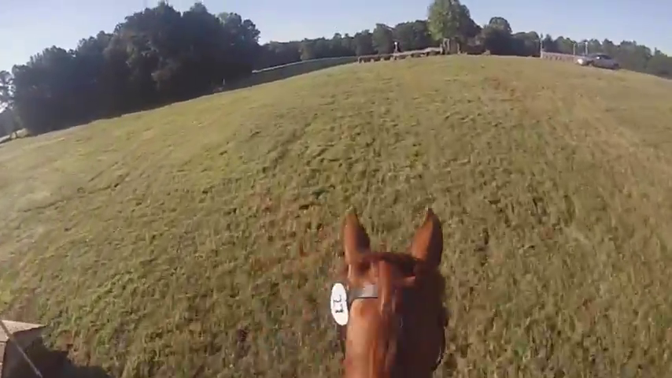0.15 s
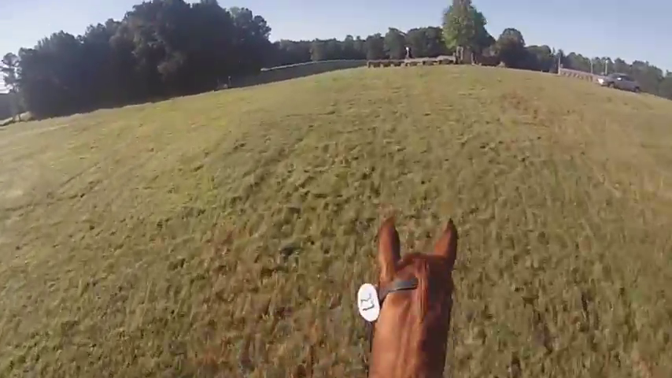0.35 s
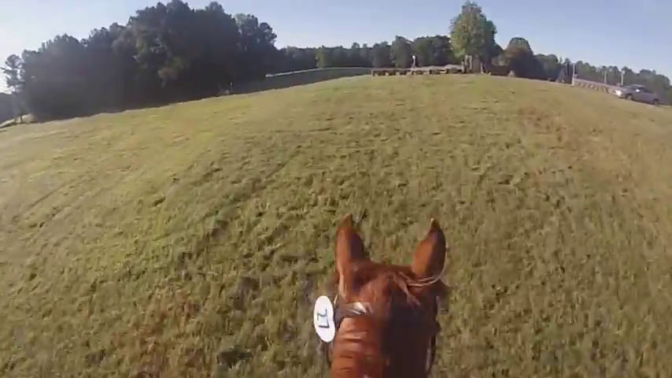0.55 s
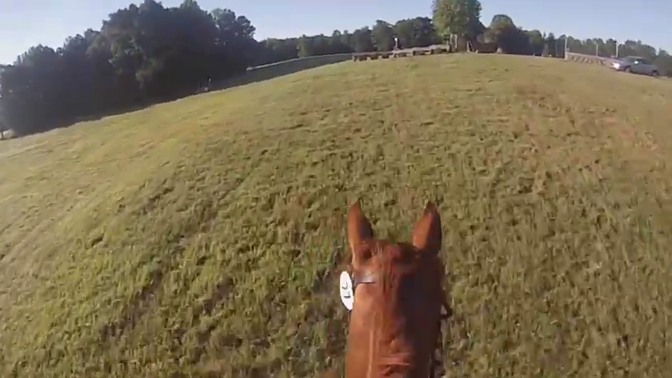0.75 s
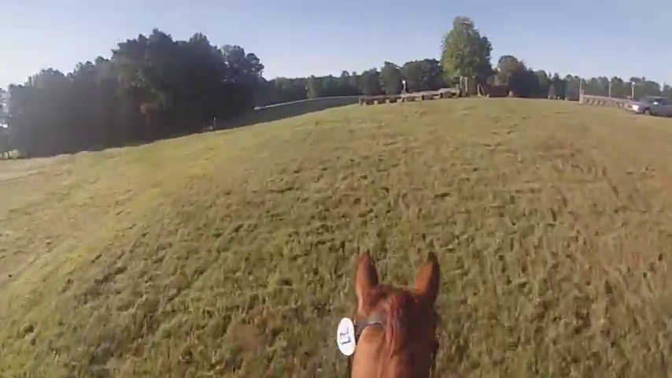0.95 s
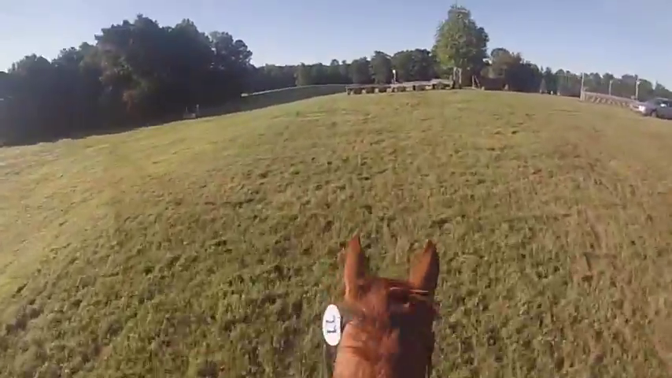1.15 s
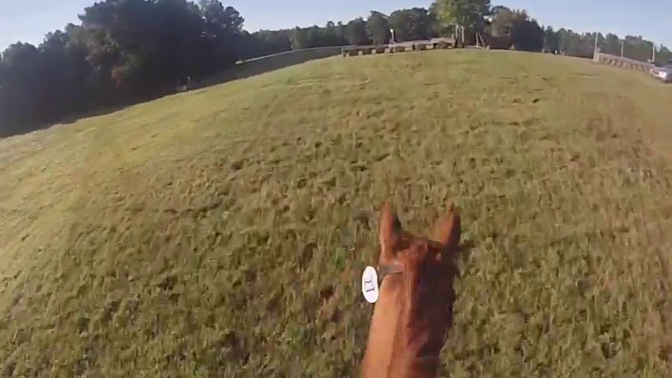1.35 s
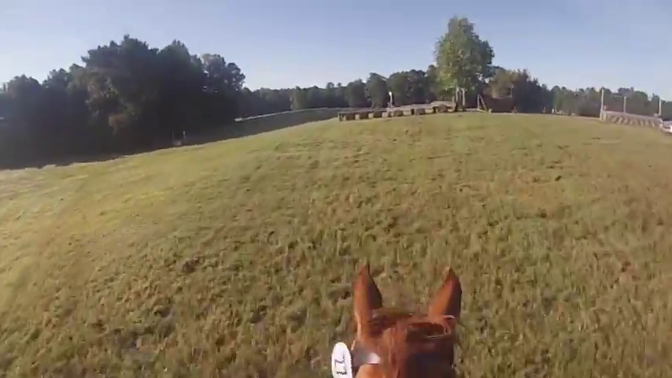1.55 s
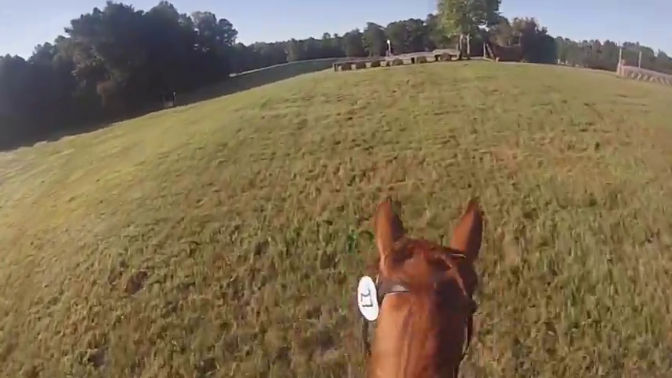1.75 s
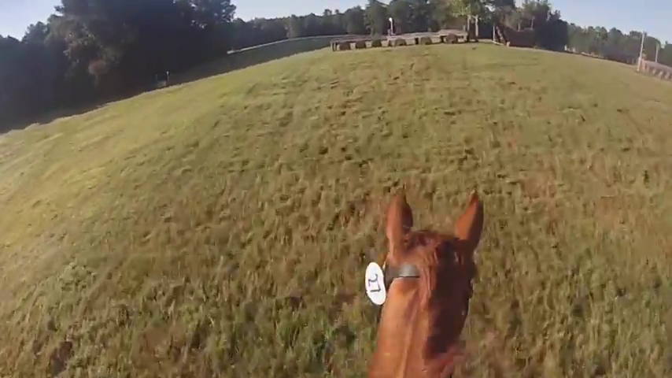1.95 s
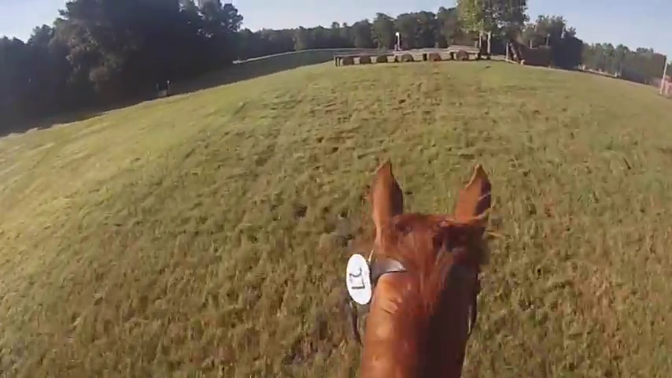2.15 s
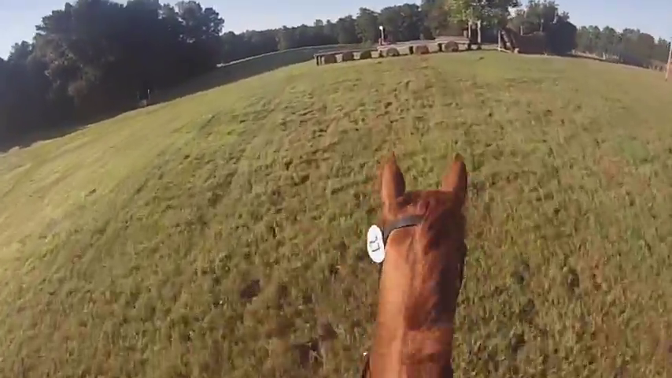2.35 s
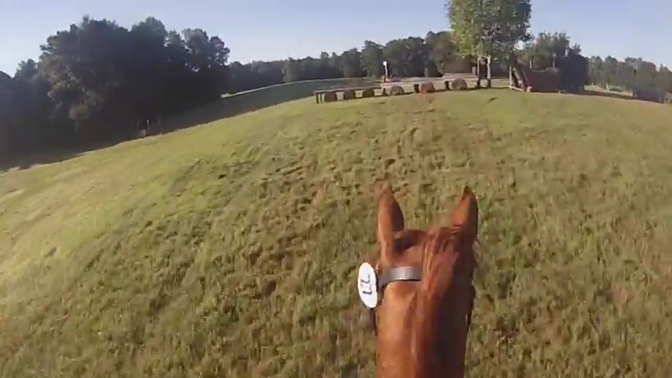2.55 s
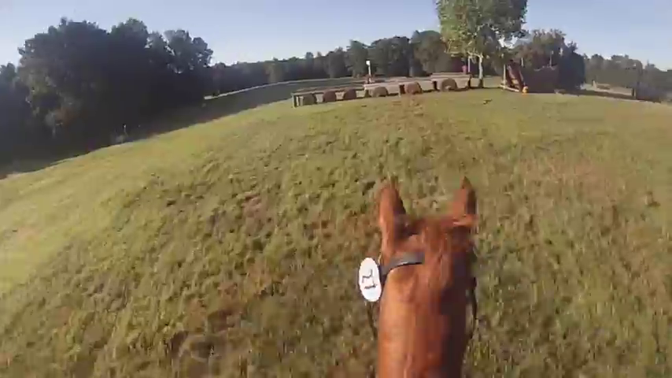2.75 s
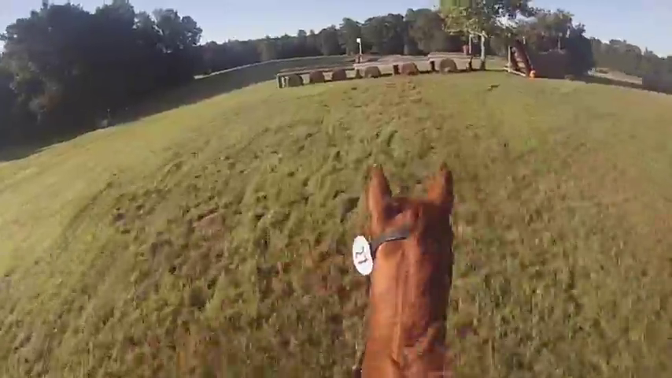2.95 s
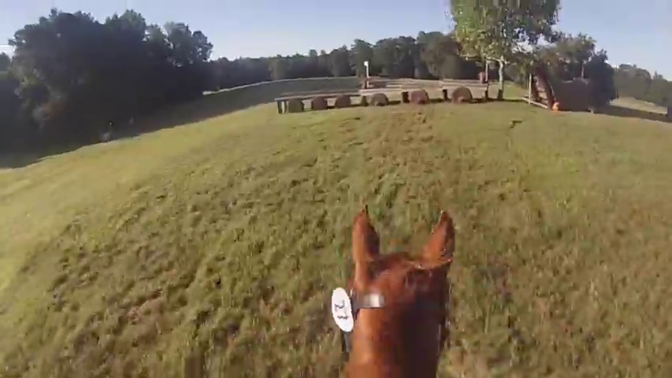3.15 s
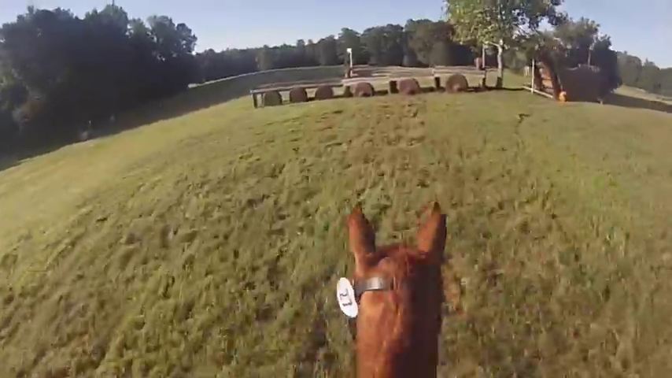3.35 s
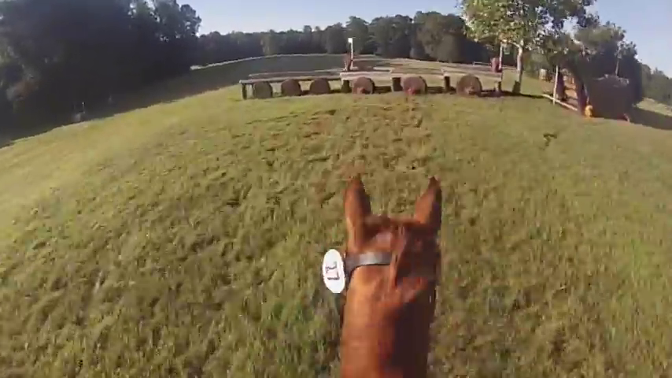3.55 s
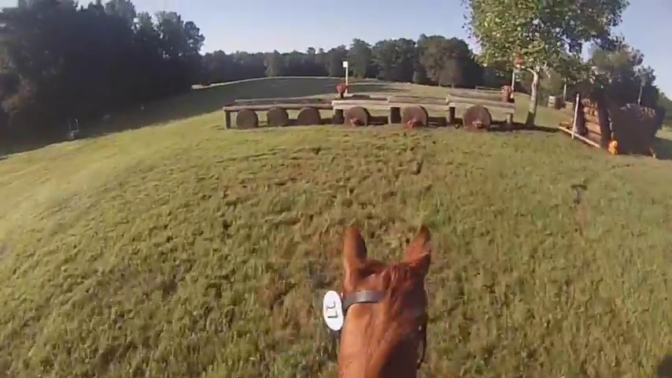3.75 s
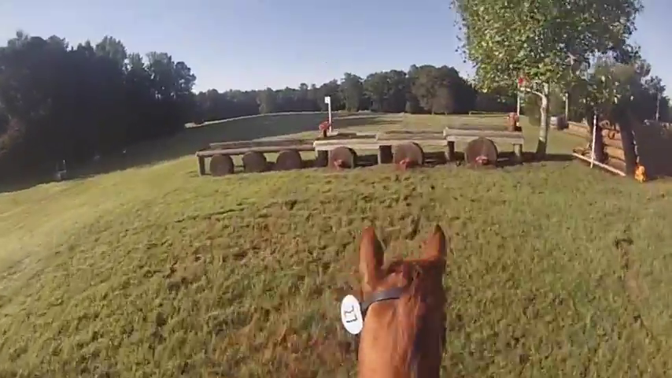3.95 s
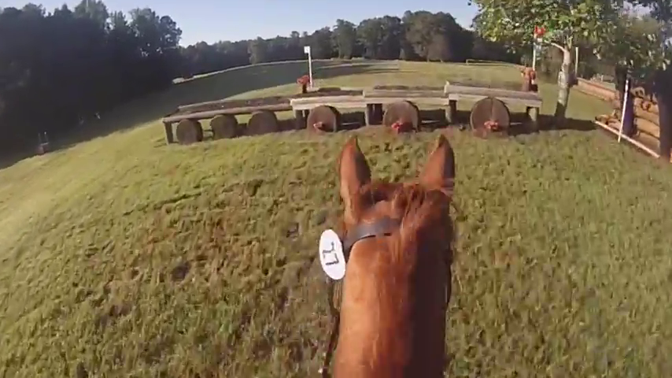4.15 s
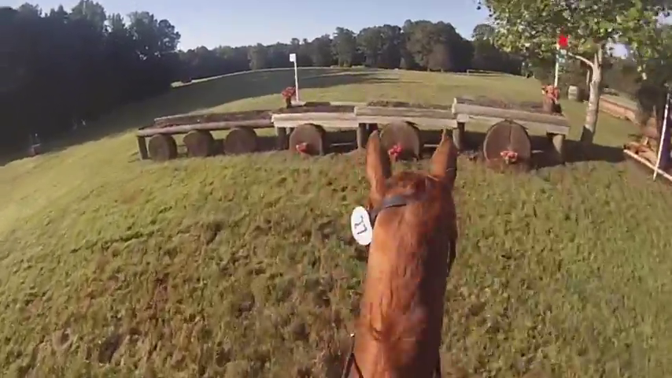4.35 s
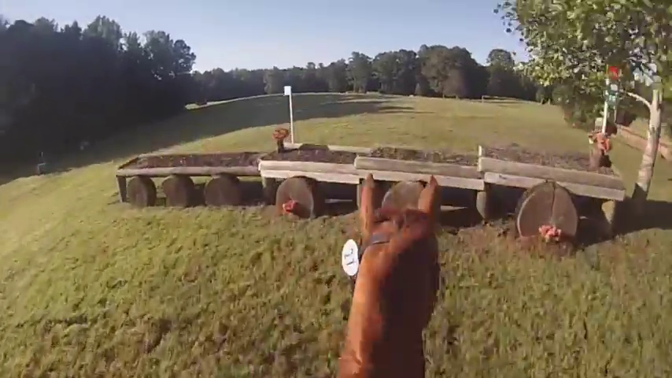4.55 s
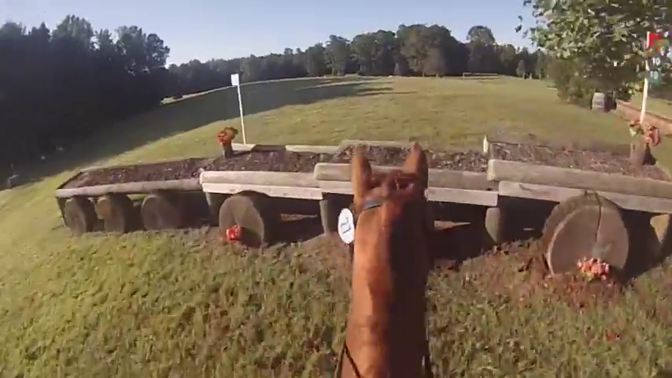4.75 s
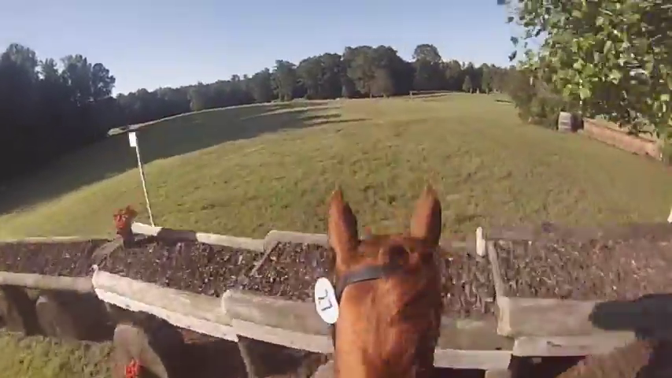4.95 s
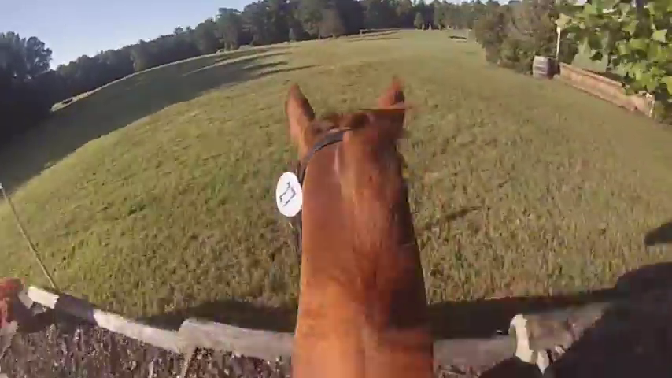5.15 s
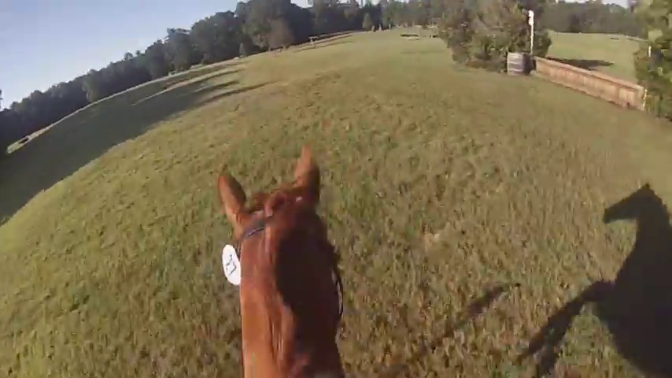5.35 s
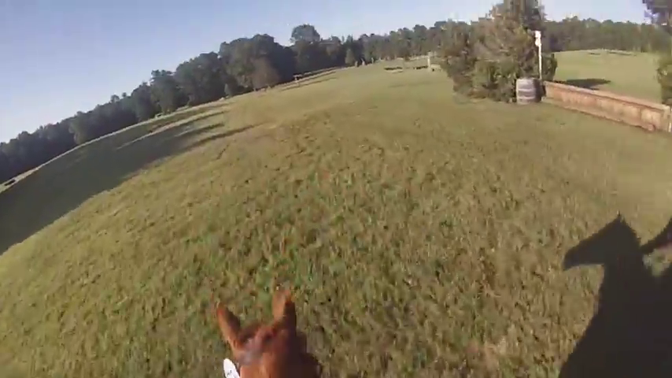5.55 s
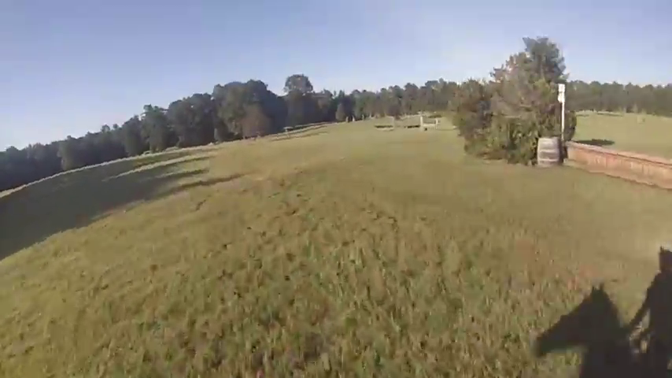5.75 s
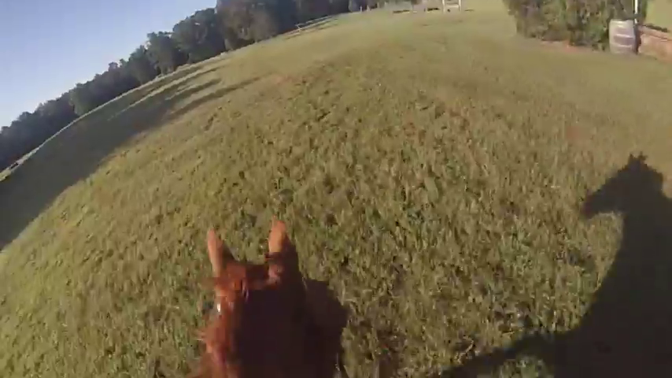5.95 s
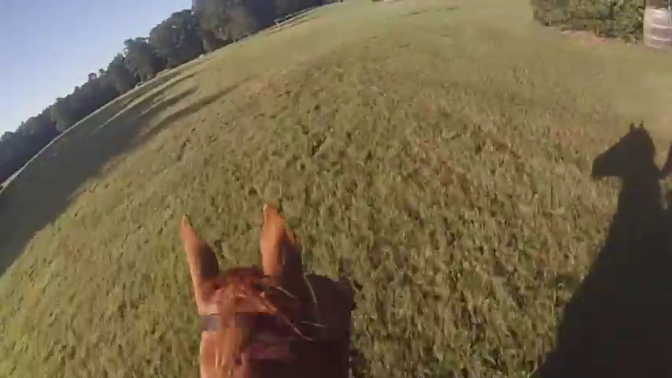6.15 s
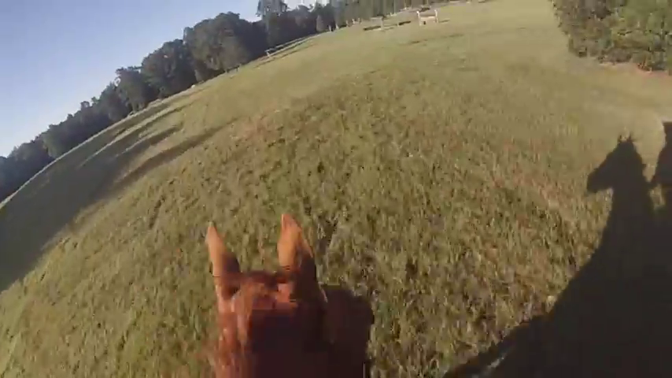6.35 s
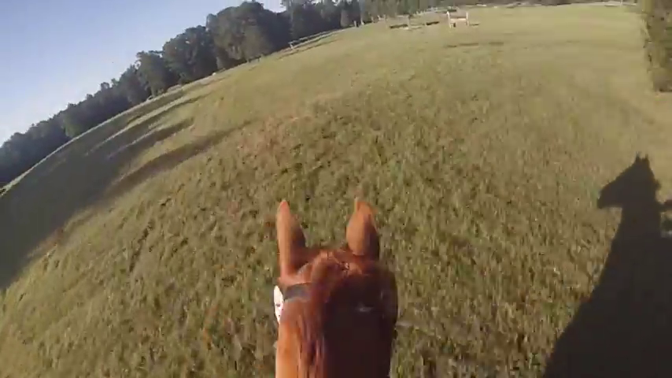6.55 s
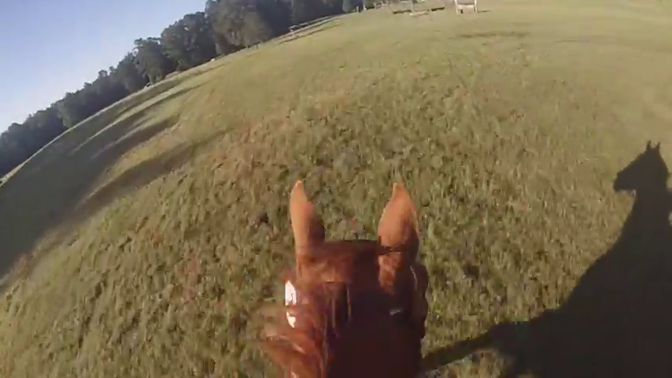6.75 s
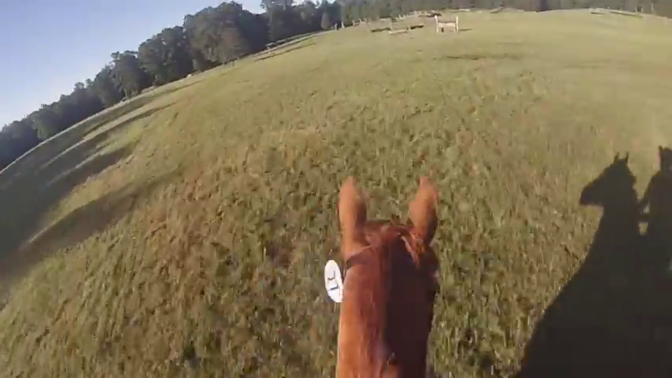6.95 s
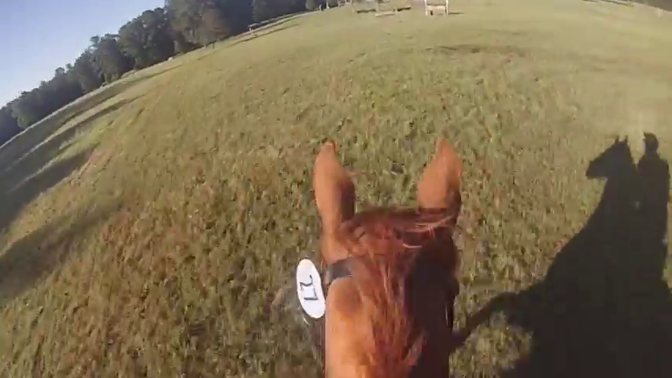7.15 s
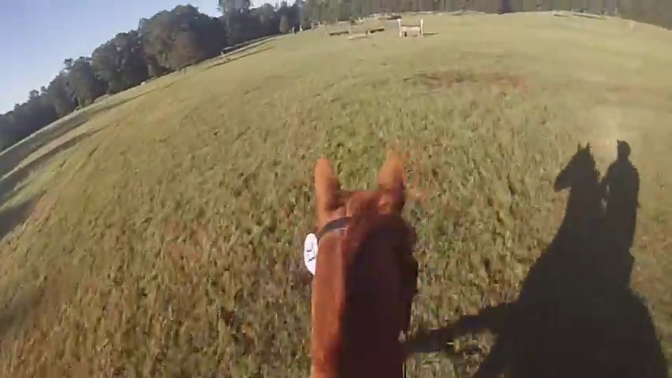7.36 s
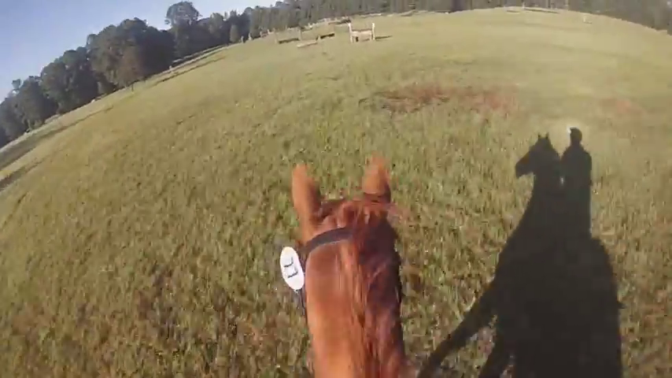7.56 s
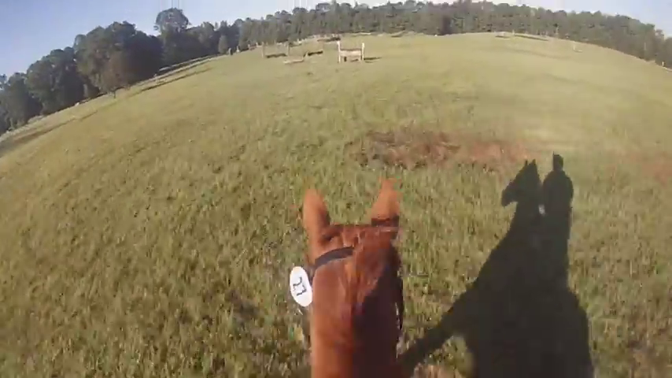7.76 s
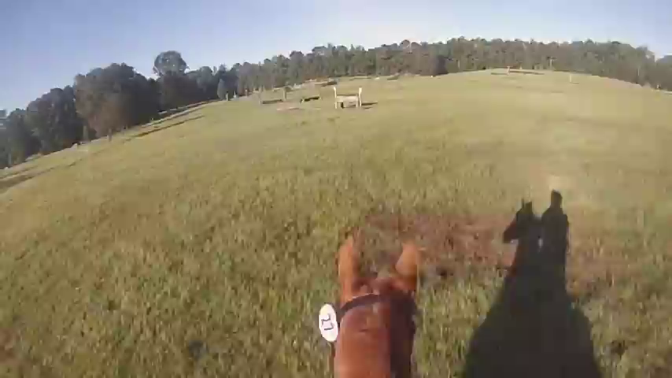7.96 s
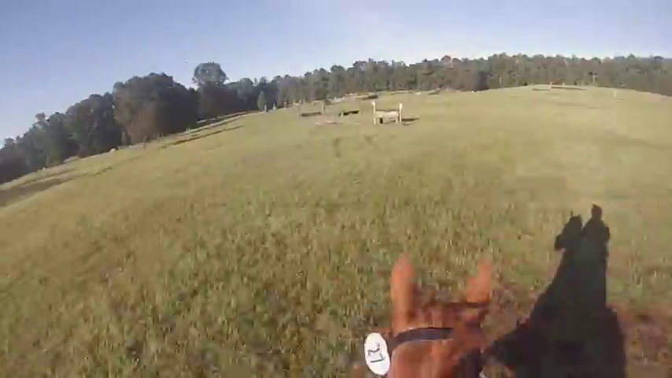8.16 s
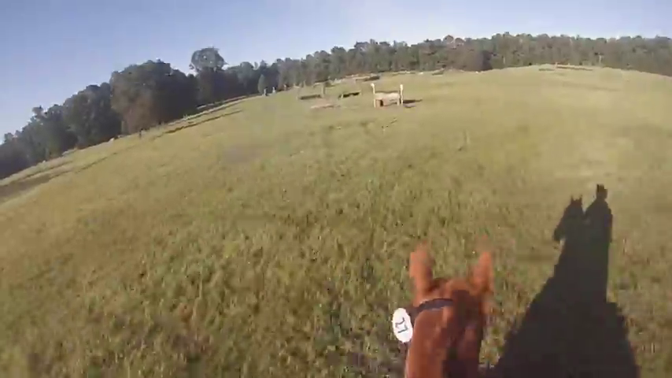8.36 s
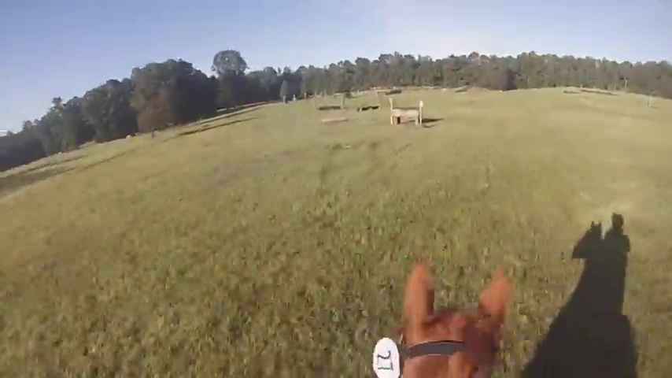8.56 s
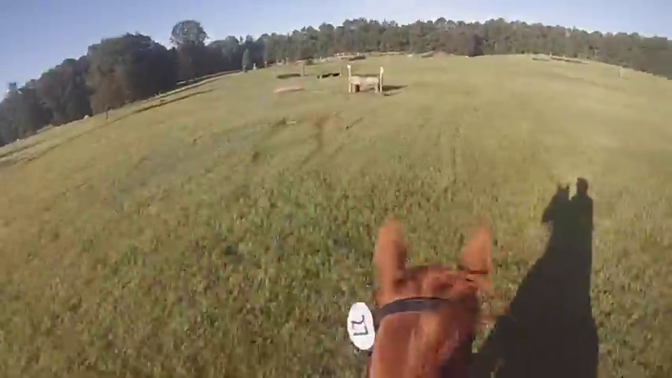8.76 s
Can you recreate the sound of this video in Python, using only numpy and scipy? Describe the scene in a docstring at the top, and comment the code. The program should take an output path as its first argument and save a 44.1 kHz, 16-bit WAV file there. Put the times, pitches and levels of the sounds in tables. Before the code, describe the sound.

Heard through a closed camera housing on a galloping rider's helmet: low wind buffeting, a hollow drone and dull stride thumps. A sharp knock comes early; near five seconds hard plastic clacks cluster at the jump, then a heavy rattling landing jolt. Afterwards the knocks stop and the wind grows stronger.

```python
"""Grassland, at a gallop and across a jump, heard from a camera in a closed housing on a rider's helmet.
Headwind is shaped noise: a blown cavity drone, low buffeting and a rush in the housing's resonances, with
thin whistles. Strides swing a damped spring mount; knocks ring the housing's shell and back plate over a
low thump. Straps squeak and swish as filtered noise; gain control ducks the hardest hits over faint hiss."""
import sys
import numpy as np
from scipy import signal
from scipy.fft import next_fast_len
from scipy.io import wavfile

SR = 44100
rng = np.random.default_rng(int(sys.argv[2]) if len(sys.argv) > 2 else 0)


def persist_wave(psi):
    """Save psi, clipped to +-1, as 16-bit WAV."""
    counts = np.round(np.clip(psi, -1, 1) * 32767).astype(np.int16)
    wavfile.write(sys.argv[1], SR, np.atleast_2d(counts).T)


N = 388521
TIME = np.arange(N) / SR

# headwind rising and falling as the head nods into it, before small gusts:
# (time [s], buffeting level [dB], rush level in the upper modes [dB])
HEADWIND_CURVE = [(0.0, -47, -59.5), (0.29, -44.5, -55.5), (0.56, -43, -57), (1.0, -47.5, -59),
                  (1.15, -40.5, -52), (1.4, -44.5, -58.5), (1.64, -43, -51.5), (1.95, -46.5, -58.5),
                  (2.15, -42.5, -56), (2.5, -51.5, -62), (2.75, -50.5, -65.5), (2.98, -50, -64.5),
                  (3.05, -42.5, -59), (3.14, -49.5, -63), (3.24, -40.5, -54.5), (3.29, -53, -66),
                  (3.33, -37, -55.5), (3.46, -48, -61), (3.58, -41, -53), (4.03, -39.5, -49),
                  (4.37, -47.5, -63), (4.68, -39.5, -45), (4.92, -41.5, -54), (5.05, -38.5, -47.5),
                  (5.34, -44.5, -59), (5.45, -44, -54), (5.68, -40.5, -50.5), (5.78, -31.5, -42),
                  (5.86, -37, -46.5), (5.95, -42, -46), (6.06, -45.5, -62), (6.3, -41, -51.5),
                  (6.8, -41, -53.5), (7.05, -39, -52), (7.55, -37.5, -53.5), (7.78, -37, -48.5),
                  (7.86, -36, -50.5), (8.05, -35, -49), (8.22, -32, -43.5), (8.4, -38, -44.5),
                  (8.55, -35.5, -46), (8.7, -37.5, -45.5), (8.81, -36, -48)]
# the lowest cavity mode, blown like a bottle, before its wavering: (time [s], level [dB])
DRONE_CURVE = [(0.0, -48), (0.47, -49), (0.51, -43), (0.81, -55), (0.91, -36.5), (0.96, -58.5),
               (1.1, -41.5), (1.62, -46), (1.67, -40.5), (1.81, -51), (2.18, -42.5), (2.3, -53),
               (3.73, -47), (3.75, -36.5), (4.32, -52), (4.56, -49), (4.64, -34), (4.83, -48), (4.91, -24),
               (4.95, -53), (5.15, -36.5), (5.4, -50), (5.62, -39), (5.72, -46), (5.79, -32), (5.94, -56),
               (5.99, -36), (6.13, -48.5), (7.16, -43.5), (7.7, -55), (7.73, -51), (8.81, -39)]
# the wind angle shifts the rush between modes:
# (time [s], lift of modes under 1 kHz [dB], lift of modes over 1.8 kHz [dB])
WIND_ANGLE_CURVE = [(0, 1, -4), (.5, 1, -1), (1, -1.5, -1.5), (1.6, -1, 1.5), (2.2, 0, -1.5),
                    (2.8, 2.5, -3), (3.3, 2, 0.5), (3.9, -1.5, -0.5), (4.5, 1.5, 2), (5, -4.5, -0.5),
                    (5.4, 0.5, -1.5), (5.8, -0.5, 4.5), (6.3, -1.5, 0.5), (7, -2, -1.5), (7.6, 0, -1),
                    (8.1, -0.5, 0), (8.45, -4, 1.5), (8.81, -3.5, 3)]
# low resonances stirred by buffeting: (frequency [Hz], width [Hz], relative drive [dB])
BUFFET_RESONANCES = [(87.5, 29, -4.5), (198, 65.7, -1), (248, 62, -15), (156, 30, -13), (337, 53, -12.5)]
# housing resonances that color the rush: (frequency [Hz], width [Hz], relative drive [dB])
HOUSING_RESONANCES = [(540, 197, -4.5), (809, 130, -2.5), (1301, 194, -2), (1480, 144, 0),
                      (1989, 199, -1.5), (2246, 270, -9.5), (3915, 110, -15.5)]
DRONE_HZ, DRONE_WIDTH_HZ = 123.7, 16.4
TREBLE_FALL_HZ = 2580
TREBLE_DB, TREBLE_SHARE = -69, 0.096   # level at a rush of -55 dB; dB gained per dB of rush


def headwind():
    """Turbulence blows a cavity drone, low buffeting, a rush in the housing modes and faint treble."""
    buffet_db, rush_db = in_time(HEADWIND_CURVE)
    gust_db = 0.62 * drift(2.5)   # small gusts lift both together
    buffet_db = buffet_db + gust_db
    rush_db = rush_db + gust_db

    drone = resonance(rng.standard_normal(N), DRONE_HZ, DRONE_WIDTH_HZ)
    drone = resonance(drone, DRONE_HZ, 1.7 * DRONE_WIDTH_HZ)
    envelope = np.abs(signal.hilbert(drone, next_fast_len(N))[:N])
    drone = drone / (envelope + 1e-9) ** 0.4   # a blown tone steadies itself
    drone_gain = amp(in_time(DRONE_CURVE)[0] + 1.0 * drift(4))

    buffet = eddies(BUFFET_RESONANCES, flutter_db=-0.5, patchy_db=2.5)
    buffet = butter(buffet, 421, "low", order=4)

    low_db, high_db = in_time(WIND_ANGLE_CURVE)
    modes = [(hz, width_hz, db + low_db * (hz < 1000) + high_db * (hz > 1800))
             for hz, width_hz, db in HOUSING_RESONANCES]
    rush = butter(eddies(modes, flutter_db=1.5, patchy_db=-0.5), 3030, "low")
    rush = rush / butter(rush, 1650, "high", order=4).std()   # the curve sets the upper modes' level

    treble = butter(rng.standard_normal(N), TREBLE_FALL_HZ, "low")
    treble = butter(treble, 4530, "high")
    treble_db = TREBLE_DB + TREBLE_SHARE * (rush_db + 55)

    low = drone_gain * rms_one(drone) + amp(buffet_db) * rms_one(buffet)
    return low + amp(rush_db) * rush + amp(treble_db) * rms_one(treble)


def eddies(modes, flutter_db, patchy_db):
    """Turbulence drives every mode; all flutter together and each also on its own."""
    together = flutter_db * drift(29)
    total = 0
    for hz, width_hz, db in modes:
        drive = amp(db + together + patchy_db * drift(11.2))
        total = total + drive * resonance(rng.standard_normal(N), hz, width_hz)
    return rms_one(total)


# stride jolts: (time [s], peak level [dB], starting swing frequency [Hz], decay T60 [s])
STRIDE_JOLTS = [(0.008, -34, 44, 0.13), (0.102, -31, 42.2, 0.39), (0.213, -36, 43.7, 0.4),
                (0.281, -29, 42.4, 0.13), (0.325, -17.5, 39.4, 0.075), (0.377, -19.5, 28, 0.23),
                (0.858, -13.5, 32.5, 0.1), (0.904, -16, 28.2, 0.22), (1.382, -18.5, 29.6, 0.39),
                (1.623, -29.5, 48.3, 0.3), (1.941, -18.5, 33, 0.22), (2.133, -20.5, 45.6, 0.28),
                (2.314, -26, 43, 0.42), (2.426, -22.5, 53.8, 0.14), (2.531, -31, 34, 0.47),
                (2.826, -36, 32.8, 0.37), (2.964, -22, 28.4, 0.26), (3.037, -25, 41.5, 0.39),
                (3.379, -25, 33.8, 0.46), (3.451, -17, 34.1, 0.39), (3.772, -12.5, 44, 0.39),
                (3.91, -13.5, 35.2, 0.25), (4.036, -22.5, 36.2, 0.14), (4.257, -18.5, 42.8, 0.55),
                (4.466, -18, 30, 0.18), (4.635, -12.5, 51.4, 0.26), (4.771, -3, 32, 0.22),
                (4.901, -10.5, 33.8, 0.15), (5.039, -17.5, 48.3, 0.3), (5.215, -15.5, 37, 0.26),
                (5.438, -19, 45.5, 0.52), (5.746, -14, 37, 0.11), (5.7675, 6.5, 34.6, 0.15),
                (5.858, -15, 52, 0.09), (5.998, -8.5, 34.7, 0.19), (6.202, -38, 29.8, .16),
                (6.582, -20.5, 44.9, 0.79), (6.988, -27.5, 29.6, 0.82), (7.184, -21.5, 44, 0.38),
                (7.394, -22.5, 47.4, 0.25), (7.497, -21.5, 29.4, 0.096), (7.617, -26, 45.3, 0.82),
                (7.76, -19, 31.2, 0.08), (7.792, -15, 45.2, 0.39), (8.102, -21, 38.2, 0.37),
                (8.314, -21.5, 42.5, 0.27), (8.438, -22, 35.2, 0.057)]
MOUNT_HZ, MOUNT_WIDTH_HZ = 38, 47
TREMBLE_DB = -39   # steady trembling, before wandering
AFTER_DB, AFTER_T60_S = -31.5, 0.96   # gain and envelope decay of added trembling, before softening
SLACK_PER_S = 0.726   # the swing's frequency falls by twice this share each second


def mount():
    """The mount is a damped spring: it trembles all the time and swings out after each stride."""
    tremble = resonance(rng.standard_normal(N), MOUNT_HZ, MOUNT_WIDTH_HZ)
    wander_db = 1.5 * drift(3)
    after = after_jolts(AFTER_T60_S) ** 0.59   # softens the contrast and lengthens the decay
    shake = amp(TREMBLE_DB + wander_db) + amp(AFTER_DB) * after
    out = shake * rms_one(butter(tremble, 51.8, "low", order=4))
    t = TIME[:SR // 2]
    for s, db, hz, t60 in STRIDE_JOLTS:
        push = (1 - np.exp(-t / 0.01)) ** 2   # the push builds gradually
        # the spring slackens as the swing dies
        swing = push * amp(-60 * t / t60) * np.sin(2 * np.pi * hz * (t - SLACK_PER_S * t * t))
        add(out, s, -amp(db) * swing / np.abs(swing).max())
    return out


def after_jolts(t60):
    """An envelope that jumps with every jolt and dies away."""
    s, db, *_ = np.transpose(STRIDE_JOLTS)
    kicks = np.zeros(N)
    kicks[np.round(s * SR).astype(int)] = amp(db)
    decay = signal.lfilter([1], [1, -amp(-60 / (t60 * SR))], kicks)
    return butter(decay, 25, "low", order=1)


# housing against its mount: (time [s], peak level of the ringing [dB], contact time [ms],
# thump gain [dB], back plate lift [dB], middle modes lift [dB], top modes lift [dB])
HOUSING_KNOCKS = [(0.332, -31, 0.36, -32, -5, 10, 0), (0.8855, -40, 3, -47, -7, 4, 0),
                  (0.8879, -15, 0.86, -25.5, -22, 5, -10), (3.783, -34, 0.73, -31.5, 1, -3, -3),
                  (4.638, -16.5, 0.42, -42, -5, 8, -9), (4.6409, -5.5, 0.48, -24, -6, 6.5, 5),
                  (4.9013, -14.5, 0.47, -29.5, 3.5, 0, -4), (4.9019, -9, 0.37, -17.5, -4, 5, -2),
                  (4.998, -16.5, 0.52, -25, -1, 7, 0), (5.023, -16.5, 0.44, -26, -5, 10.5, -5),
                  (5.114, -35, 4.2, -26.5, -3, 0, 0), (5.122, -18.5, 4, -32, -8, -5, 0),
                  (5.129, -24, 3.2, -40, 0, 2, 0), (5.179, -41, 0.63, -36, 12, -5, 0),
                  (5.218, -27.5, 0.32, -40, -18, 7, -4), (5.3771, -22.5, 0.25, -38, 3.5, 5, 3),
                  (5.767, -11, 0.27, -34, 4, 9, -14), (5.772, -26.5, 0.25, -32, -8, 13, 9),
                  (5.776, -17, 0.2, -40, -15, 23, 9), (5.78, -18, 0.22, -39, -12, 15, 5),
                  (5.783, -16, 0.28, -40, 6, 9, 4), (5.785, -17, 0.36, -8, -8, -1, -5),
                  (5.825, -15, 0.54, -20, -13, 5, -11), (5.865, -15, 0.37, -19, 6, 2, -12),
                  (5.878, -17, 0.3, -29, -9, 15, -14), (5.894, -28, 0.89, -23.5, 12, -1, -4),
                  (5.993, -17.5, 0.41, -21.5, -6, 8, -15)]
# knocks from the other side, which first suck the diaphragm out: (time [s])
PULLING_KNOCK_TIMES = [.8885, 4.902, 5.219, 5.767, 5.993]
# ringing shell of the housing: (frequency [Hz], relative gain [dB], decay T60 [s])
SHELL_RESONANCES = [(233, -4, 0.038), (395, 6, 0.016), (1270, -7.5, 0.016), (1594, -30, .012),
                    (2090, -16, 0.015), (2270, -27, 0.011), (3000, -12.5, 0.012), (3370, -25, 0.0063),
                    (3840, -14, 0.026)]
# low body of the knock: (frequency [Hz], relative gain [dB], decay T60 [s])
THUMP_RESONANCES = [(73.5, 14.5, 0.051), (158, -16, 0.056)]
PLATE_HZ, PLATE_DB, PLATE_T60_S = 763, 9.5, 0.013   # back plate; gain before each knock's lift


def knocks():
    """A click with a short rattle, softer for a longer contact, rings shell and plate over a low thump."""
    out = np.zeros(N)
    chance = rng.standard_normal((len(HOUSING_KNOCKS), len(SHELL_RESONANCES)))
    click = np.eye(1, SR // 8)[0]
    rattles = rng.standard_normal((len(HOUSING_KNOCKS), SR // 8)) * np.exp(-TIME[:SR // 8] / 0.0041)
    thump = sum(amp(db) * ring(click, hz, t60) for hz, db, t60 in THUMP_RESONANCES)
    thump = butter(thump, 210, "low")
    for knock, luck, rattle in zip(HOUSING_KNOCKS, chance, rattles):
        s, db, contact_ms, thump_db, plate_db, middle_db, top_db = knock
        blow = click + 0.046 * rattle
        shell = amp(PLATE_DB + plate_db) * ring(blow, PLATE_HZ, PLATE_T60_S)
        for (hz, mode_db, t60), z in zip(SHELL_RESONANCES, luck):
            lift_db = middle_db * (1000 < hz < 2500) + top_db * (hz >= 2500)
            shell = shell + amp(mode_db + lift_db + 2 * z) * ring(blow, hz, t60)
        shell = butter(shell, np.clip(1000 / contact_ms, 100, 15000), "low", order=3)
        shell = butter(shell, 4100, "low", order=8)   # the closed housing passes little above its top mode
        pulls = np.min(np.abs(s - np.array(PULLING_KNOCK_TIMES))) < .0025
        side = -1 if pulls else 1
        add(out, s, side * (amp(db) * shell / np.abs(shell).max() - amp(thump_db) * thump))
    return out


# wind whistling at the port; the shortest rows are brief ticks ringing the same tone: (time [s], level before
# fades [dB], length [s], center pitch [Hz])
PORT_WHISTLES = [(0.075, -59, 0.037, 1460), (0.108, -47.5, 0.23, 1507), (0.15, -59, 0.21, 823),
                 (0.43, -49, 0.05, 1494), (0.676, -59, 0.095, 1456), (0.811, -46, 0.0077, 1520),
                 (0.82, -47, 0.0091, 1520), (1.434, -55, 0.042, 1470), (1.859, -47, 0.29, 1482),
                 (2.434, -57, 0.27, 1497), (2.887, -52, 0.012, 1480), (3.045, -53, 0.022, 1480),
                 (3.556, -48.5, 0.26, 1500), (4.379, -42.5, 0.01, 1480), (4.412, -51, 0.027, 1510),
                 (4.827, -44.5, 0.1, 1543), (4.95, -48, 0.12, 1520), (5.178, -49, 0.022, 830),
                 (5.432, -50, 0.025, 1490), (6.36, -50, 0.087, 1420), (8.054, -48.5, 0.34, 1445)]


def whistles():
    """A thin wavering tone in a breath of narrow noise, setting in fast and fading."""
    out = np.zeros(N)
    air = rng.standard_normal(N) * amp(2.0 * drift(27))
    waver, flicker = 0.022 * drift(45), amp(4.0 * drift(35))
    for s, db, length, hz in PORT_WHISTLES:
        i = round(s * SR)
        share = np.arange(round(length * SR)) / (length * SR)
        span = slice(i, i + len(share))
        blown = air[i - 900:][:len(share) + 900]   # the run-in lets the resonances build up
        blown = rms_one(resonance(resonance(blown, hz, 220), hz, 280)[900:])
        phase = 2 * np.pi * np.cumsum(hz * (1 + waver[span])) / SR
        tone = np.sin(phase) * flicker[span]
        fade = np.minimum(share * length / 0.0024, 1) * np.sqrt(1 - share ** 1.24)
        add(out, s, amp(db) * rms_one(1.2 * blown + tone) * fade)
    return out


# strap squeaks: (time [s], overall gain [dB], length [s], upper tone [Hz],
# lower tone relative level [dB], lateness of the lower tone [exponent])
STRAP_SQUEAKS = [(2.442, -65.5, 0.05, 2370, -1, 0.4), (3.045, -62.5, 0.013, 2310, 3, 0.4),
                 (3.486, -42.5, 0.0195, 2070, 0, 0.4), (4.4534, -37.5, 0.027, 2170, -7, 1.5)]
# further narrow resonances in each squeak: (frequency [Hz], width [Hz], relative level [dB])
SQUEAK_RESONANCES = [(2320, 150, -16), (1940, 110, -19), (3580, 200, -21), (4150, 270, -13),
                     (4980, 300, -24), (5400, 170, -31), (6750, 300, -35), (7400, 360, -34.5)]
# straps and cloth brushing past: (time [s], direct level [dB], length [s], brightness [Hz],
# level heard through the housing modes [dB])
STRAP_SWISHES = [(0.314, -61, 0.037, 2980, -51), (2.435, -67, 0.079, 5040, -64),
                 (3.753, -69, 0.048, 5000, -47), (3.877, -69, 0.2, 6000, -64),
                 (5.377, -48, 0.0058, 6900, -38.5), (5.38, -53.5, 0.05, 7150, -55),
                 (5.672, -61.5, 0.24, 6000, -68), (5.812, -60, 0.082, 5050, -50),
                 (5.864, -58.5, 0.1, 5840, -50), (6.961, -65, 0.024, 6030, -62),
                 (7.259, -50.5, 0.077, 1890, -61), (7.759, -62, 0.047, 5540, -43),
                 (8.153, -68, .24, 4470, -68), (8.418, -64, .24, 4470, -63)]


def straps():
    """Squeaks are friction noise in narrow resonances, the lower tone coming late; swishes are broad."""
    out = np.zeros(N)
    for s, db, length, hz, lower_db, lateness in STRAP_SQUEAKS:
        late = np.minimum(np.arange(round(length * SR) + 900) / (length * SR), 1)
        air = rng.standard_normal(SR // 8)[:len(late)]
        grip = np.minimum(late / 0.092, 1) * np.clip((1 - late) / 0.15, 0, 1)   # abrupt start and stop
        parts = [(grip * (1.3 - late), hz, 260, 0), (grip * late ** lateness, 1500, 200, lower_db)]
        parts += [(grip, *mode) for mode in SQUEAK_RESONANCES]
        tone = 0
        for envelope, at_hz, width_hz, level_db in parts:
            friction = steady(resonance(air, at_hz, width_hz), 0.34)
            tone = tone + amp(level_db) * rms_one(resonance(envelope * friction, at_hz, width_hz))
        add(out, s, amp(db) * tone)
    for s, db, length, hz, body_db in STRAP_SWISHES:
        rub = butter(burst(length), np.clip(hz, 900, 12000), "low", order=6)
        body = resonance(rub, 1460, 260) - 0.91 * resonance(rub, 1290, 200) + 0.47 * resonance(rub, 1980, 220)
        direct = butter(rub, 810, "high")
        add(out, s, amp(db) * rms_one(direct) + amp(body_db) * rms_one(body))
    return out


def burst(length):
    """Noise that starts fast and fades out."""
    share = np.arange(round(length * SR)) / (length * SR)
    return rng.standard_normal(SR // 4)[:len(share)] * np.minimum(share / 0.23, 1) * np.sqrt(1 - share ** 2)


def steady(x, share):
    """Even out part of the level's wandering, as a self-sustained tone does."""
    return rms_one(x / (np.abs(signal.hilbert(x)) + 1e-9) ** np.clip(share, 0, 1))


def amp(db):
    """Gain of a level in dB."""
    return 10 ** (np.asarray(db) / 20)


def rms_one(x):
    """Scale to rms 1."""
    return x / np.sqrt(np.mean(x ** 2) + 1e-20)


def in_time(rows):
    """Each column of a curve table, sample by sample."""
    s, *columns = np.transpose(rows)
    return [np.interp(TIME, s, c) for c in columns]


def drift(rate):
    """Slow random wandering with rms 1, made at every 40th sample; a higher rate [Hz] wanders faster."""
    r = np.exp(-80 * np.pi * rate / SR)
    noise = rng.standard_normal(N // 40 + 2002)
    slow = signal.lfilter([1], [1, -2 * r, r * r], noise)[2000:]   # drop the run-in
    return np.interp(np.arange(N) / 40, np.arange(len(slow)), rms_one(slow))


def butter(x, hz, kind, order=2):
    """Butterworth low- or high-pass."""
    return signal.sosfilt(signal.butter(order, hz, kind, fs=SR, output="sos"), x)


def resonance(x, hz, width_hz):
    """Two-pole resonance with gain about 1 on top."""
    r = np.exp(-np.pi * width_hz / SR)
    top = np.array([1, 0, -1]) * (1 - r * r) / 2
    return signal.lfilter(top, [1, -2 * r * np.cos(2 * np.pi * hz / SR), r * r], x)


def ring(clicks, hz, t60):
    """A unit click sets a decaying sine of about height 1 ringing."""
    r, w = amp(-60 / (t60 * SR)), 2 * np.pi * hz / SR
    return signal.lfilter([0, np.sin(w)], [1, -2 * r * np.cos(w), r * r], clicks + 1e-18)


def add(out, s, sound):
    """Mix a short sound in at time s."""
    i = round(s * SR)
    out[i:i + len(sound)] += sound[:N - i]


def scene():
    """Everything reaches one microphone."""
    return (headwind() + mount() + knocks() + whistles() + straps())[None]


HISS_DB, HISS_FALL_HZ = -73.5, 10100
LIMIT_DB = -8.5   # half of any excess above this is taken off
EXCESS_RELEASE_DB_S = 71.5   # fall of the held excess; the gain recovers at half this rate
CUTOFF_HZ = 15700


def record(dry):
    """Microphone hiss, a gain control that drops within milliseconds and creeps back, and the top cut."""
    x = dry[0] + amp(HISS_DB) * rms_one(butter(rng.standard_normal(N), HISS_FALL_HZ, "low"))
    over_db = np.maximum(20 * np.log10(np.abs(x) + 1e-9) - LIMIT_DB, 0)
    release_db = EXCESS_RELEASE_DB_S * TIME
    held_db = np.maximum.accumulate(over_db + release_db) - release_db
    r = np.exp(-1 / (.0025 * SR))   # 2.5 ms smoothing
    gain = amp(-.5 * signal.lfilter([1 - r], [1, -r], held_db))
    x = np.clip(x * gain, -1, 1)
    return signal.sosfilt(signal.cheby2(12, 60, CUTOFF_HZ, fs=SR, output="sos"), x)[None]


dry = scene()
out = record(dry)
persist_wave(out)
```